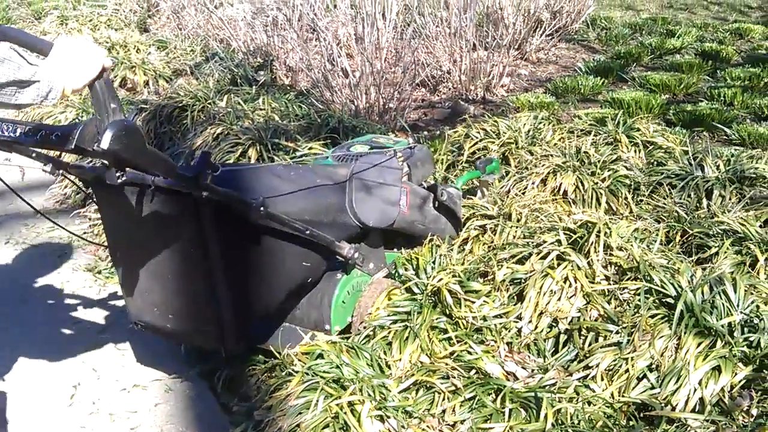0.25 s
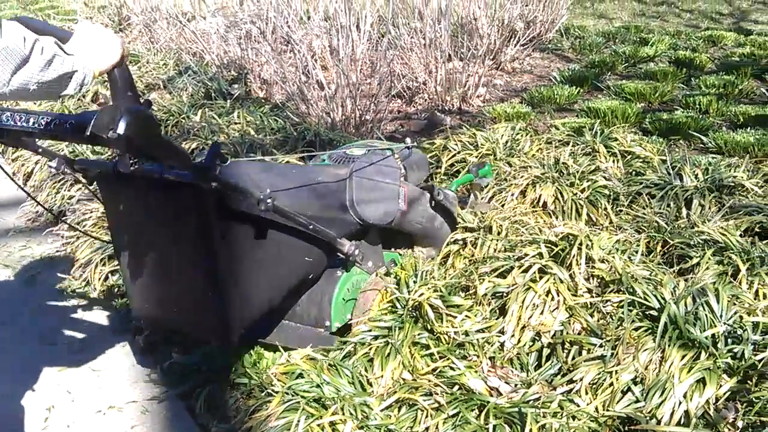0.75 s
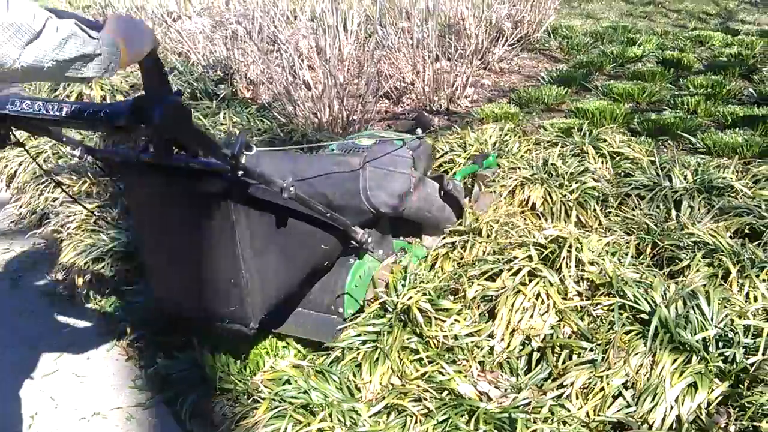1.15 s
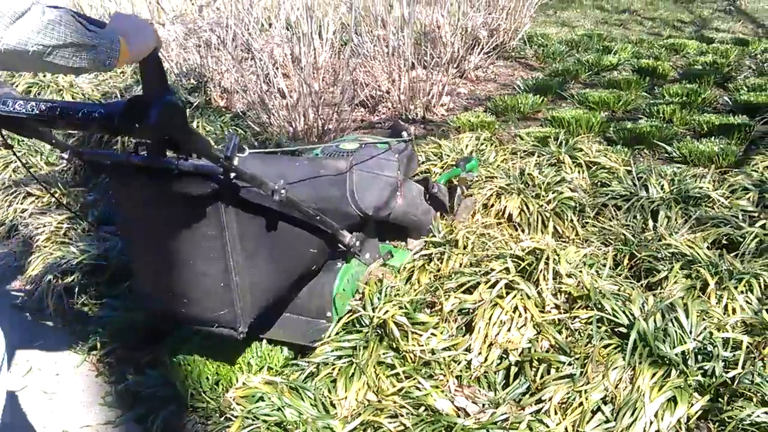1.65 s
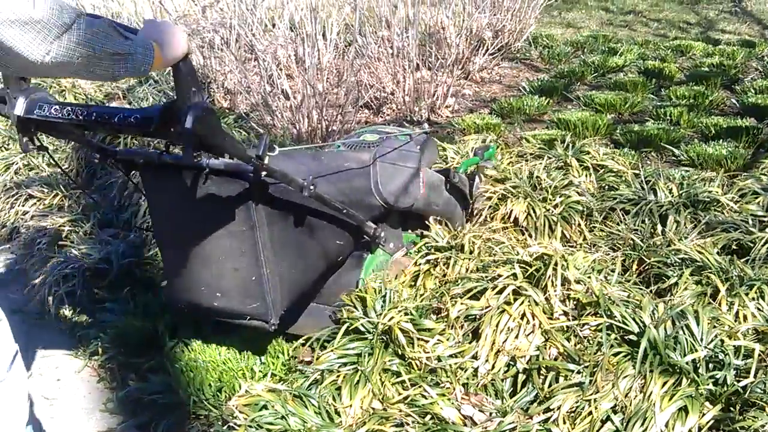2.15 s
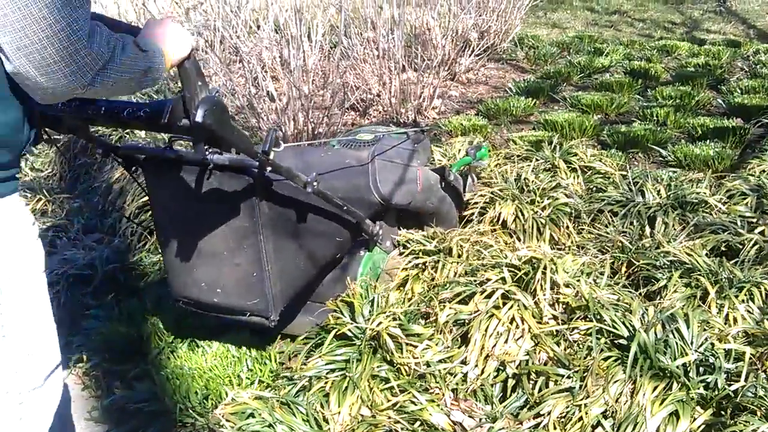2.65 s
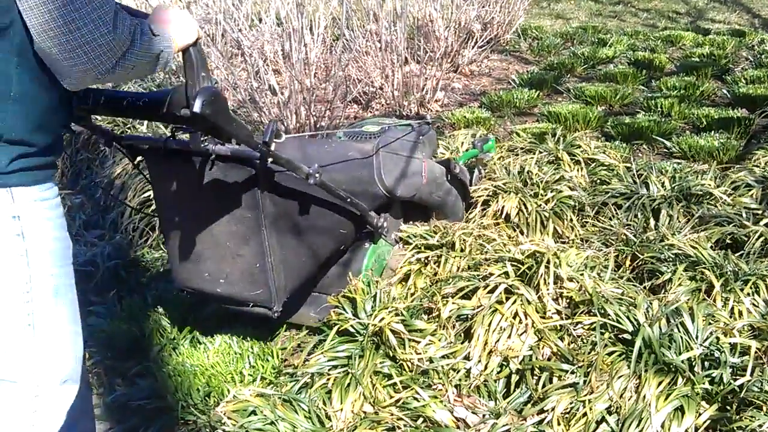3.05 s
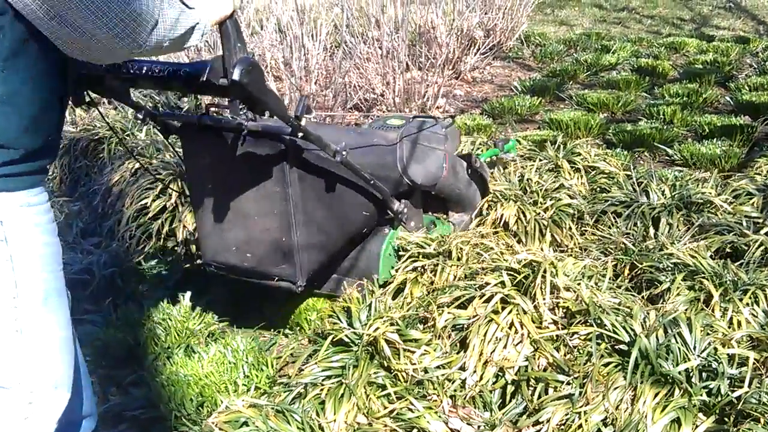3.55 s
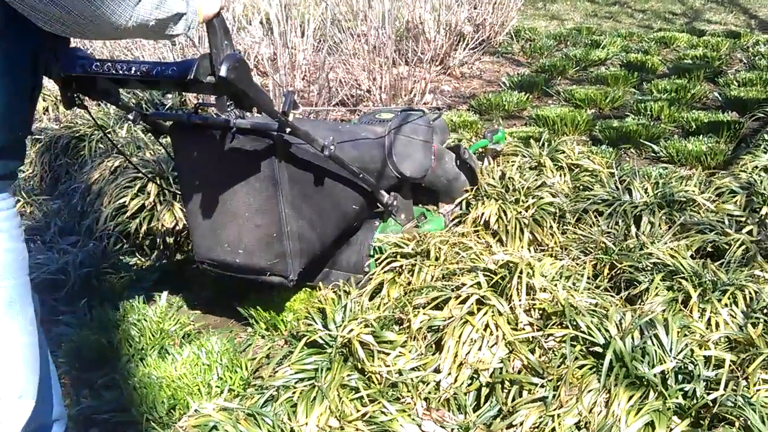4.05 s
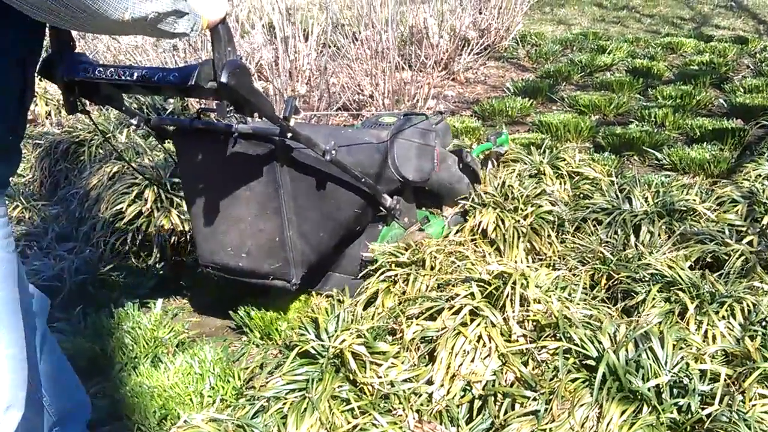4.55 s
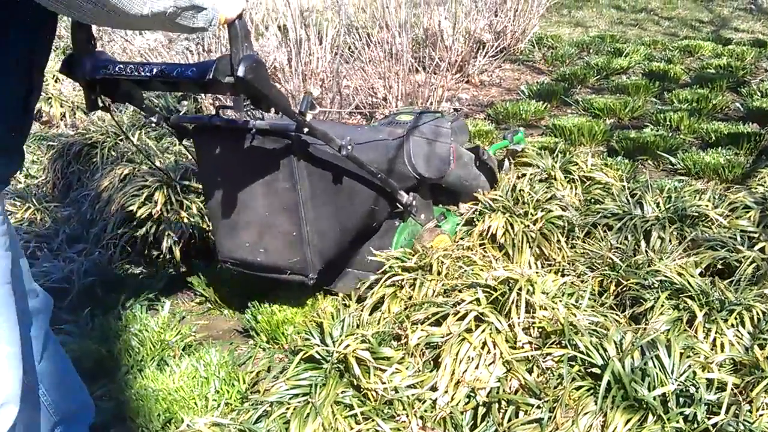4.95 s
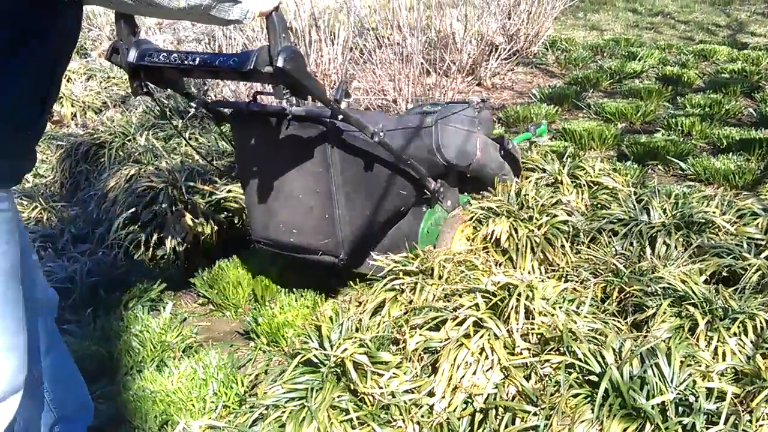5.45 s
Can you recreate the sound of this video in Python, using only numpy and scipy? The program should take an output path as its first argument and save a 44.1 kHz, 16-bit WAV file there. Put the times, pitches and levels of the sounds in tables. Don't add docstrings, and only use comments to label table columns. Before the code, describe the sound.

A petrol lawn mower drones and whines close by, surging and sagging as it chews thick grass, with stalks snapping and clippings rushing.

```python
import sys
import numpy as np
from scipy import signal
from scipy.fft import rfft, irfft, next_fast_len
from scipy.io import wavfile
from scipy.ndimage import uniform_filter1d

SR = 44100
rng = np.random.default_rng(int(sys.argv[2]) if len(sys.argv) > 2 else 0)


def inscribe(sig):
    pcm = np.round(np.clip(np.atleast_2d(sig).T, -1, 1) * 32767)
    wavfile.write(sys.argv[1], SR, pcm.astype(np.int16))


def gain_from_db(level_db):
    decades = np.asarray(level_db, float) / 20
    return 10 ** decades


N = 251811
SIZE = next_fast_len(N + SR // 10)
FREQ = np.arange(1, SIZE // 2 + 2) * SR / SIZE
FULL_FEED_DB, FULL_SEAL_DB = -28, -29

# t/s, firing rate f/Hz
CRANK_SPEED = [(0.0, 24.6), (0.27, 25.3), (0.73, 25.3), (0.89, 24.7), (1.06, 24.9), (1.19, 24.4),
               (1.38, 24.5), (1.51, 25.1), (2.05, 25.3), (2.22, 24.8), (2.85, 26.6), (3.26, 25.7),
               (3.47, 25.6), (4.48, 26.0), (4.66, 25.5), (5.22, 25.9), (5.39, 24.5), (5.71, 24.8)]
# t/s, blade drone level/dB, overtone against drone level/dB
SKIRT_SEAL = [(0, -37.5, -2), (.46, -21.5, -11.5), (1.0, -40, 8), (1.2, -34.5, -3), (1.5, -20, -5.5),
              (1.97, -23.5, -8), (2.29, -42, 7), (2.43, -31, -0.5), (2.62, -27.5, -0.5), (3.27, -20, -0.5),
              (3.52, -39, 7), (3.8, -32.5, 2), (4.4, -21.5, -6), (5.14, -23, -9), (5.24, -38.5, -3),
              (5.45, -51, 8), (5.52, -37.5, -5), (5.71, -38.5, -2)]
# t/s, feed level/dB, dryness level/dB
LEAF_FEED = [(0.0, -36.5, 2.7), (0.32, -28.1, -2.05), (1.2, -30, 0.5), (1.34, -32.5, 0), (1.5, -25.5, -4),
             (1.76, -26, -5), (2.21, -33, 1), (2.91, -22.5, -4), (3.05, -22, -7), (3.39, -22, -2.5),
             (3.55, -26.5, 0.5), (3.75, -31.4, 1), (4.51, -27.5, -3), (4.87, -29, -4), (5.13, -25, -2.5),
             (5.25, -35, 1), (5.45, -34.5, 0.5), (5.71, -30, 1.0)]
# t/s, lumpiness (0-2)
LUMPINESS = [
    (0, 1.1),
    (2.0, 1.6),
    (2.7, 0.99),
    (3.4, 1.1),
    (3.7, .55),
    (5.71, .6),
]
# t/s, length/s, wet bulk level/dB,
# dry shreds level/dB
TUFTS_AND_GAPS = [(0.088, 0.0052, 8, 2.5), (0.28, 0.0082, 3.5, 3), (0.532, 0.0064, 3, 0.5),
                  (0.63, 0.041, 0, 2.5), (0.742, 0.021, -6.5, -0.5), (0.86, 0.016, 6, 3.5),
                  (1.127, .008, -8, -3), (1.775, 0.0075, -2, -5), (1.823, 0.0072, 3, 5.5),
                  (1.895, 0.0089, 4.5, 0.5), (1.973, 0.024, -0.5, 3), (2.1, 0.022, -6.5, -2.5),
                  (2.256, 0.013, -3, -1), (2.297, 0.0092, 4.5, -2), (2.41, 0.014, 4, -1),
                  (2.504, 0.035, -8, -0.5), (2.603, 0.011, 3, -1), (2.729, .011, 1.5, 4.5),
                  (2.766, 0.0086, -3, -2.5), (2.783, 0.008, 4, 0), (2.96, 0.016, 4, 3),
                  (3.038, 0.0068, -2, -3.5), (3.205, 0.0089, 1, 1.5), (3.274, 0.01, 4, 2),
                  (3.335, 0.023, -6.5, -4.5), (3.58, .011, 5, 3), (3.885, 0.0072, 6, 1.5),
                  (5.017, 0.009, 4.5, 0.5), (5.046, 0.0063, -6, -7), (5.47, 0.016, -3, -2.5)]
# t/s, peak level/dB, deck thump against peak level/dB, treble against peak level/dB
STALK_SNAPS = [(0.154, -11, -20, -6), (0.2206, -14, -14, -3), (0.2807, -8.5, -10.5, -10),
               (0.7144, -4.5, -20, -11), (0.8768, -7.5, -14, -11), (1.281, -19, -15, -10),
               (1.5635, -15, -9, 1), (1.644, -11.5, -12, -3), (1.921, -8, -24, -9), (1.9689, -8, -10.5, -3),
               (1.9994, -16, -25, 0), (2.386, -8.5, -23, -11), (2.436, 3, -23.5, -13.5),
               (2.6238, -13, -4.5, -2), (2.7071, -10, -8, -24), (2.7281, -4, -31, -10.5),
               (2.775, -11, -3.5, -27), (2.861, -4.5, -20, -8), (2.9133, -12, -36, -2.5),
               (3.1838, -9, -19, -4), (3.2387, -13, -25, -22), (3.3592, -7, -3, -9), (3.436, 0, -11, -18),
               (3.497, 7, -33, -21), (5.071, -8.5, -17, -1), (5.177, -6, -18, -11), (5.5477, -13, -22, -3)]
# multiple of the firing rate, level/dB
EXHAUST_TONES = [(3, -66), (4, -47), (5, -51), (6, -58), (7, -53)]
# multiple of the firing rate, level against the deck ring/dB
BLADE_TONES = [(16, -25), (20, -26), (24, -26), (28, -22), (32, -13), (36, -17), (56, -18), (60, -17)]
# base level/dB, then dB added per dB of feed, dryness, seal, wet bulk and dry shreds
DECK_BOOM_LAW = (-36.5, 0.61, -0.06, 0.2558, 1.13, -0.5)
DECK_RING_LAW = (-28, 0.91, 0.15, 0.09, 1.4, -1.4)
CLIPPING_PATTER_LAW = (-27, 1.11, 1.15, -0.0252, 0.37, 0.7)
CLIPPING_RUSH_LAW = (-28, 0.44, 0.7, -0.04, 0.03, 0.9)
# f/Hz, level per Hz/dB
BOOM_COLOUR = [(30, -21), (60, -5.5), (100, -20), (170, -1), (260, 2), (350, 0), (450, -29.5), (620, -9),
               (800, -27)]
# f/Hz, width/Hz, level/dB
DECK_RESONANCES = [(866.6, 257, 5), (1492, 460, 3), (1020, 380, -7.5), (583, 250, -11)]
# f/Hz, level per Hz/dB
PATTER_COLOUR = [(700, -44), (1200, -5.5), (1700, -9), (2100, -1.5), (3390, -6.5), (4010, -5.5),
                 (5360, -14), (6750, -15.5), (7500, -33), (9000, -60)]
# f/Hz, level per Hz/dB
RUSH_COLOUR = [(5000, -58), (7000, -15.5), (7670, -22), (9530, -0.5), (10500, 2), (11400, -2),
               (12800, -10.5), (13700, -23.5), (14000, -35), (14300, -90)]
# f/Hz, related part level/dB, its lead/rad, unrelated part level/dB
SIDE_PORTS = [(100, -6.5, -.3, 0), (205, -21, 0.25, -32), (299, -9, 1.6, -22), (390, 2.5, 1.66, -21),
              (680, 9, -0.75, 9), (860, -2.5, -1.66, -17), (1190, -7, -0.3, -10), (1520, -23.5, 0.33, -12),
              (1820, -5.5, 0.27, -8.5), (3000, -4.5, -.1, -9.5), (3500, -22, 0.17, -4.5),
              (6200, 1, 1.5, -8.5), (11000, -4.5, 0.085, -11), (13200, -1.5, 0, -22)]


def read(table):
    times, *columns = np.transpose(table)
    return [np.interp(np.arange(N) / SR, times, column) for column in columns]


def along(table, column):
    rows = np.array(table)
    return np.interp(np.log(FREQ), np.log(rows[:, 0]), rows[:, column])


def through(x, response):
    return irfft(rfft(x, SIZE) * response, SIZE)[..., :N]


def unit(x):
    return x / np.sqrt(np.mean(x ** 2))


def walk(rate):
    hold = int(SR / rate)
    steps = np.repeat(rng.standard_normal(N // hold + 1), hold)
    smooth = uniform_filter1d(uniform_filter1d(steps, hold), hold)
    return unit(smooth[:N])


def flutter(rate):
    wander = walk(rate)
    return unit(wander - uniform_filter1d(wander, SR // 6))


def hiss():
    return rng.standard_normal((2, N))


def lines(table, turns, wobble_db):
    total = np.zeros(N)
    for multiple, db in table:
        level = gain_from_db(db + wobble_db * walk(9))
        total += level * np.sin(2 * np.pi * (multiple * turns + rng.random()))
    return total


def bursts(kicks, decay_s):
    half = int(4 * decay_s * SR)
    t = np.arange(-half, half + 1) / SR
    return signal.fftconvolve(kicks, np.exp(-.5 * (t / decay_s) ** 2), "same")


def cracks(kicks, decay_s):
    t = np.arange(int(6 * decay_s * SR)) / SR
    shape = np.minimum(t / .0003, 1) * np.exp(-t / decay_s)
    return signal.fftconvolve(kicks, shape)[:N]


def shreds(rate, decay_s):
    chance, size = rng.random((N, 2)).T
    return bursts((chance < rate / SR) * gain_from_db(-15 * size), decay_s)


def tufts():
    t = np.arange(N) / SR
    return sum(np.outer((wet_db, dry_db), np.exp(-.5 * ((t - middle) / length) ** 2))
               for middle, length, wet_db, dry_db in TUFTS_AND_GAPS)


def levels_db(*laws):
    feed_db, dryness_db = read(LEAF_FEED)
    seal_db = read(SKIRT_SEAL)[0]
    controls = np.array([np.ones(N), feed_db - FULL_FEED_DB, dryness_db, seal_db - FULL_SEAL_DB, *tufts()])
    return np.array(laws) @ controls


def deck_ring():
    return sum(gain_from_db(db) / (1 + 1j * (FREQ / hz - hz / FREQ) * hz / width) ** 2
               for hz, width, db in DECK_RESONANCES)


def exhaust(turns):
    boom_db = levels_db(DECK_BOOM_LAW)[0]
    load_db = uniform_filter1d(boom_db - boom_db.mean(), SR // 5)
    putter = gain_from_db(1.3 * load_db) * lines(EXHAUST_TONES, turns, wobble_db=1.5)
    return np.sqrt(2) * putter * np.array([[1], [0]])


def snaps():
    times, peak_db, thump_db, treble_db = np.transpose(STALK_SNAPS)
    crack, tick, thump = np.zeros(N), np.zeros(N), np.zeros(N)
    hit = ((times + .0015) * SR).astype(int)
    crack[hit] = gain_from_db(peak_db - 12)
    tick[hit] = gain_from_db(peak_db + treble_db - 2.5)
    thump[((times + .003) * SR).astype(int)] = gain_from_db(peak_db + thump_db - 3)
    stem_ring = 1 / (1 + 1j * (FREQ / 3200 - 3200 / FREQ) * 2.0) ** 2
    woody = unit(through(hiss(), stem_ring))
    bright = unit(through(hiss(), gain_from_db(along(RUSH_COLOUR, 1))))
    steel = unit(through(hiss(), deck_ring()))
    sound = cracks(crack, decay_s=0.0016) * woody
    sound += cracks(tick, decay_s=0.0027) * bright
    return sound + bursts(thump, decay_s=0.0037) * steel


def blade(turns, clumps):
    drone_db, overtone_db = read(SKIRT_SEAL)
    drone_db = drone_db + tufts()[0]
    low_db = drone_db + 1.3 * clumps + .7 * flutter(16)
    high_db = drone_db + overtone_db + 1.2 * clumps + .7 * flutter(16)
    drone = gain_from_db(low_db) * np.sin(2 * np.pi * 8 * turns)
    overtone = gain_from_db(high_db) * np.sin(2 * np.pi * (12 * turns + .3))
    ring_db = levels_db(DECK_RING_LAW)[0]
    whine = gain_from_db(ring_db + 1.2 * clumps) * lines(BLADE_TONES, turns, wobble_db=3.2)
    return np.sqrt(2) * (drone + overtone + whine) * np.array([[1], [0]])


def cutting(turns, clumps):
    boom_db, ring_db, patter_db, rush_db = levels_db(
        DECK_BOOM_LAW, DECK_RING_LAW, CLIPPING_PATTER_LAW, CLIPPING_RUSH_LAW)
    sweep = np.cos(2 * np.pi * 4 * turns)
    firing = np.cos(2 * np.pi * turns)
    coarse, fine = shreds(120, decay_s=0.0017), shreds(200, decay_s=0.00095)
    quick = flutter(60)

    boom = through(gain_from_db(2.3 * clumps + 1.8 * firing) * hiss(), gain_from_db(along(BOOM_COLOUR, 1)))

    ring_swell = gain_from_db(1.2 * clumps + .8 * quick) * gain_from_db(2.2 * sweep + .4 * firing)
    ring = through(ring_swell * (1 + .3 * coarse) * hiss(), deck_ring())

    def clippings():
        swell = gain_from_db(0.17 * clumps + 0.86 * quick + 0.42 * flutter(40) + 0.25 * sweep)
        return swell * (1 + 0.73 * coarse + 0.24 * fine) * hiss()

    heavy_share = 1 / (1 + (FREQ / 3100) ** 4)
    colour = gain_from_db(along(PATTER_COLOUR, 1))
    patter = through(clippings(), colour * np.sqrt(heavy_share))
    patter += through(clippings(), colour * np.sqrt(1 - heavy_share))

    rush_swell = gain_from_db(0.37 * clumps + 0.58 * quick + 0.43 * sweep)
    rush = through(rush_swell * (1 + 0.36 * coarse + 1.27 * fine) * hiss(), gain_from_db(along(RUSH_COLOUR, 1)))

    deck = gain_from_db(boom_db + 2.5) * unit(boom) + gain_from_db(ring_db) * unit(ring)
    return deck + gain_from_db(patter_db) * unit(patter) + gain_from_db(rush_db) * unit(rush)


def scene():
    turns = np.cumsum(read(CRANK_SPEED)[0]) / SR
    clumps = read(LUMPINESS)[0] * flutter(20)
    return exhaust(turns) + snaps() + blade(turns, clumps) + cutting(turns, clumps)


def band_limit(x):
    return signal.sosfilt(signal.butter(12, 14270, fs=SR, output="sos"), x)


def record(dry):
    low_cut_hz, top_hz = 106, 13950
    widen_s, widen_db, widen_hz = .010016, -4.5, 400
    mid, around = through(dry, 1 / (1 + (low_cut_hz / FREQ) ** 3.17))
    related = gain_from_db(along(SIDE_PORTS, 1)) * np.exp(1j * along(SIDE_PORTS, 2))
    side = through(mid, related) + through(around, gain_from_db(along(SIDE_PORTS, 3)))
    late = gain_from_db(widen_db) * np.exp(-2j * np.pi * FREQ * widen_s) / (1 + widen_hz / (1j * FREQ))
    side = through(side, 1 + late)
    rounded = np.tanh(np.array([mid + side, mid - side]))
    pair = through(rounded, FREQ < top_hz)
    return band_limit(pair)


dry = scene()
out = record(dry)
inscribe(out)
```